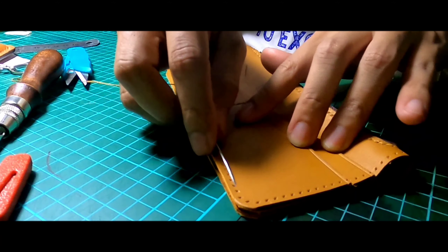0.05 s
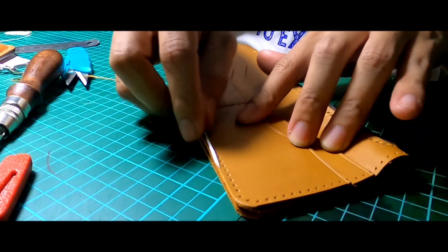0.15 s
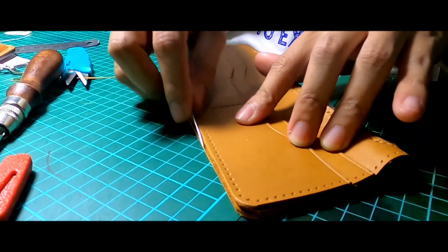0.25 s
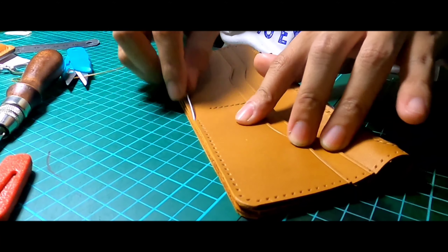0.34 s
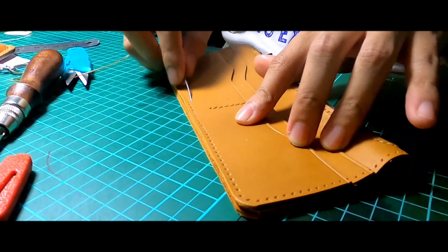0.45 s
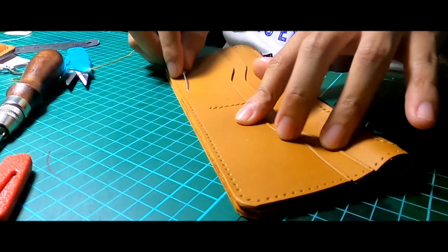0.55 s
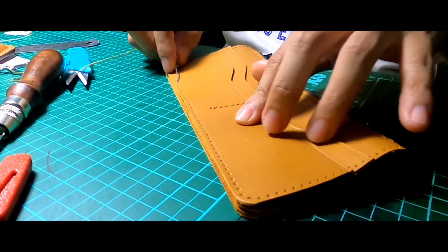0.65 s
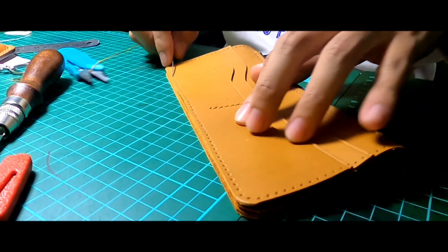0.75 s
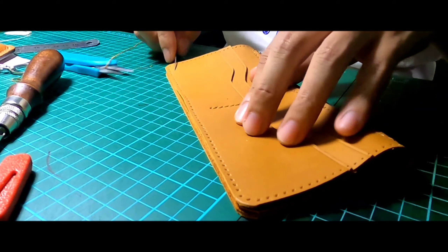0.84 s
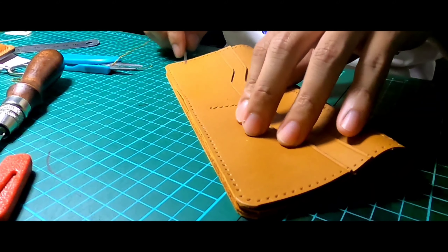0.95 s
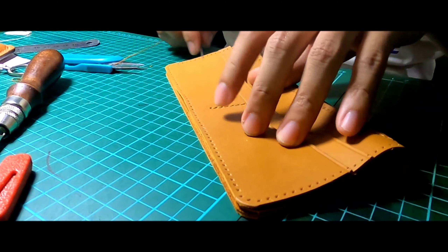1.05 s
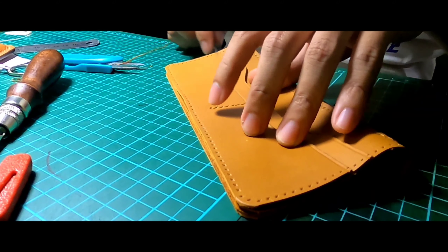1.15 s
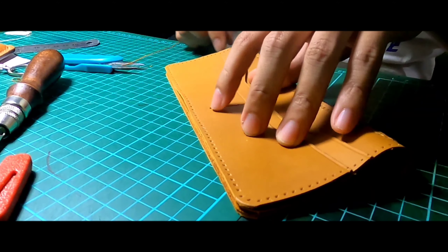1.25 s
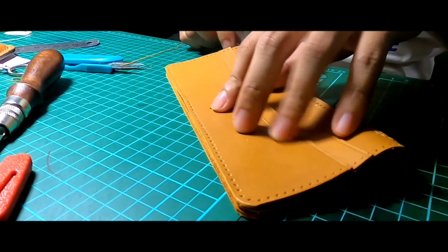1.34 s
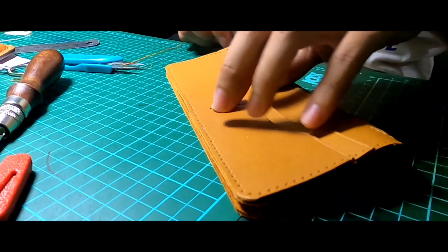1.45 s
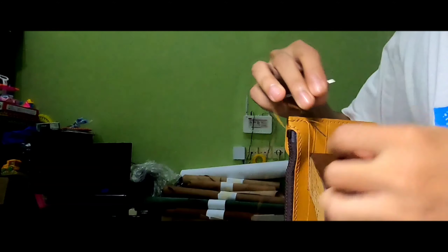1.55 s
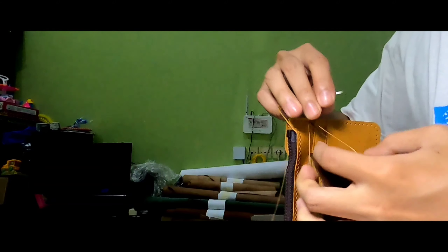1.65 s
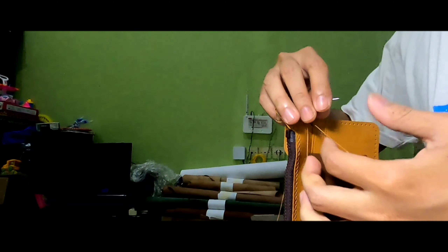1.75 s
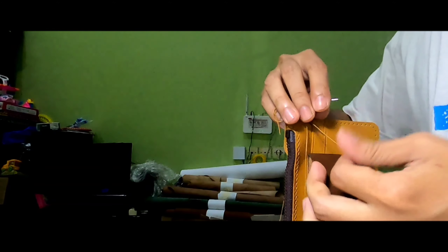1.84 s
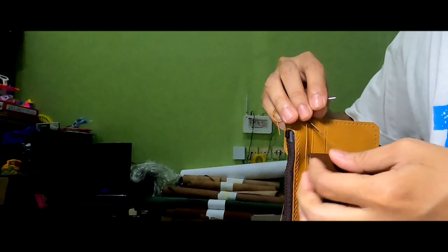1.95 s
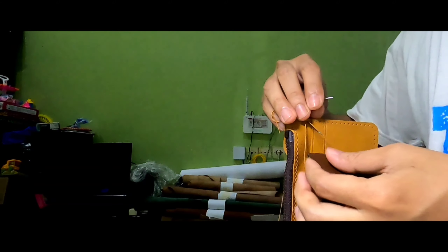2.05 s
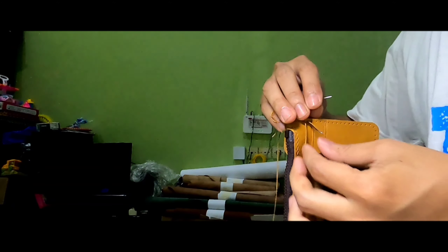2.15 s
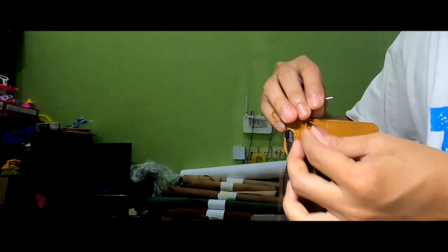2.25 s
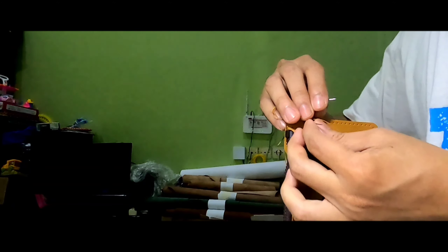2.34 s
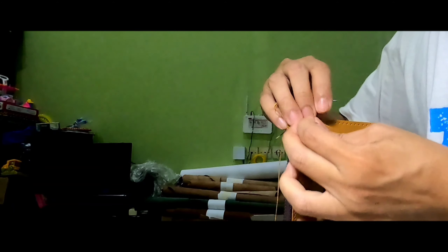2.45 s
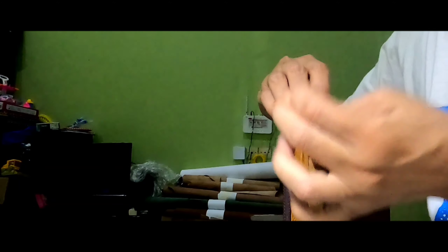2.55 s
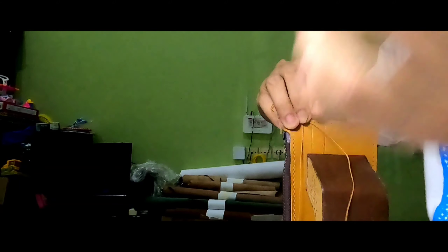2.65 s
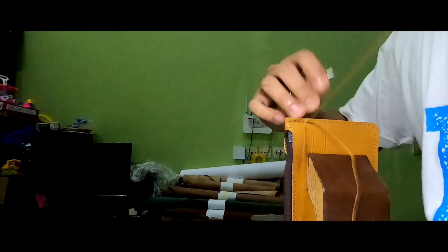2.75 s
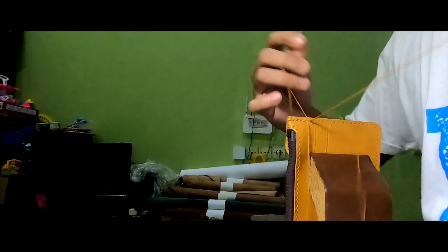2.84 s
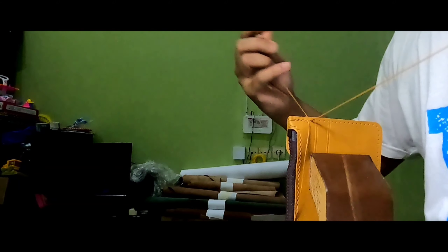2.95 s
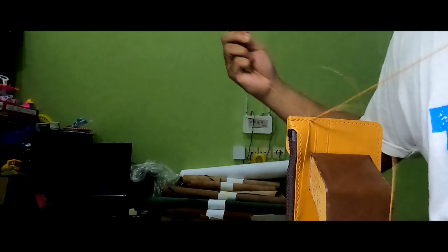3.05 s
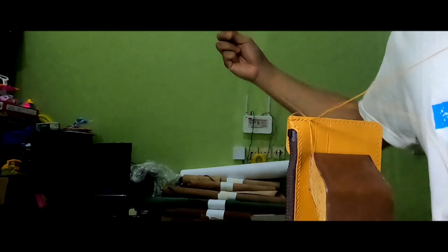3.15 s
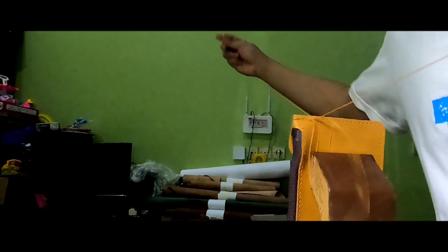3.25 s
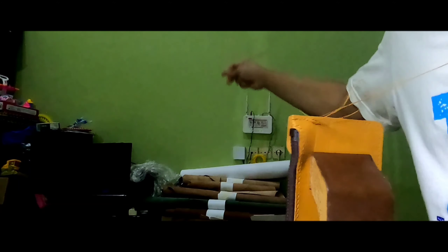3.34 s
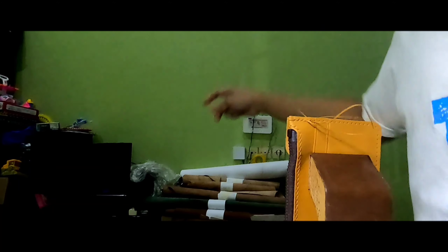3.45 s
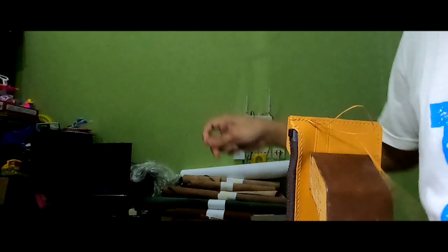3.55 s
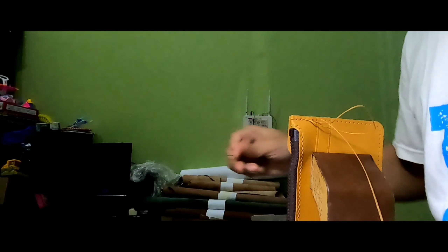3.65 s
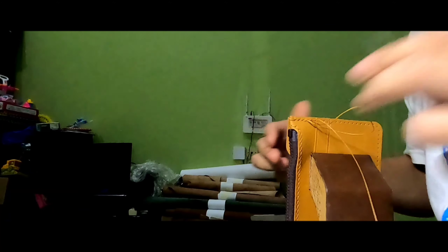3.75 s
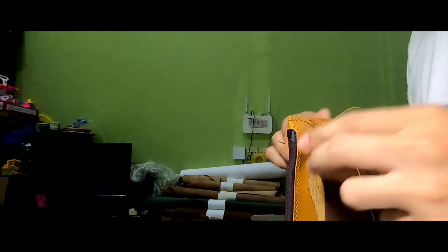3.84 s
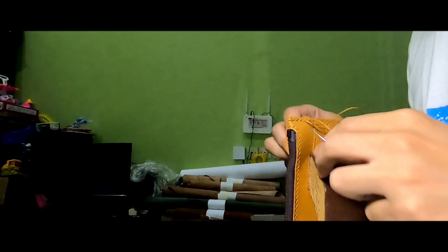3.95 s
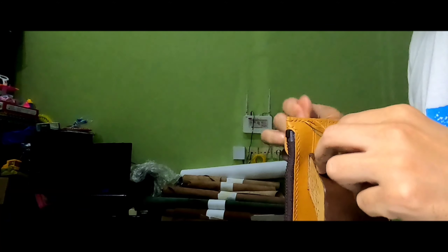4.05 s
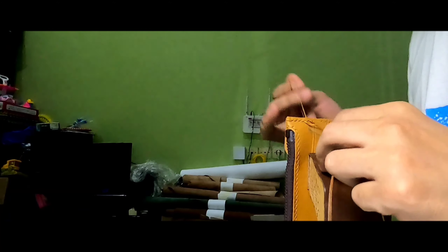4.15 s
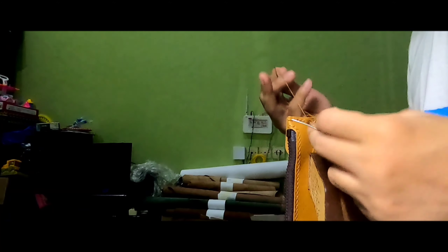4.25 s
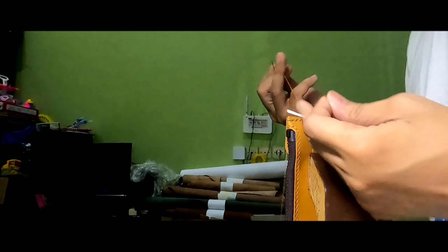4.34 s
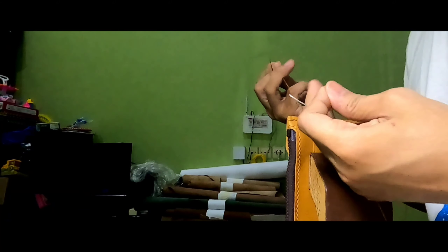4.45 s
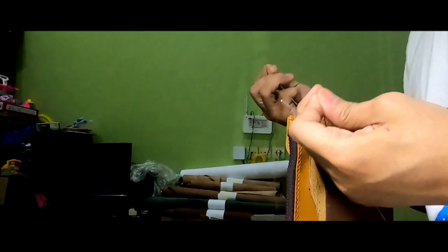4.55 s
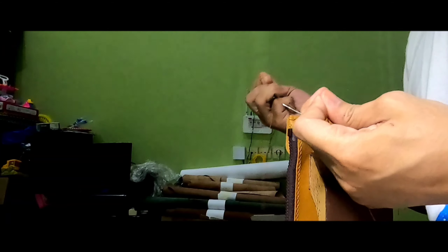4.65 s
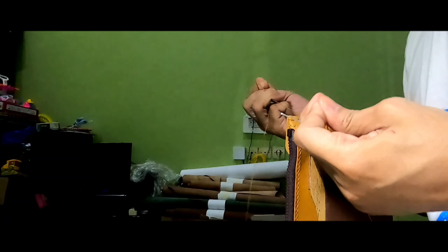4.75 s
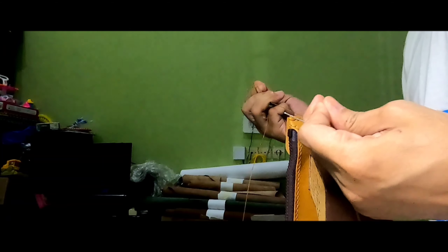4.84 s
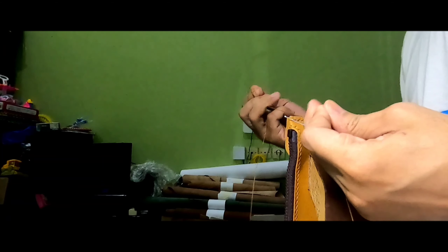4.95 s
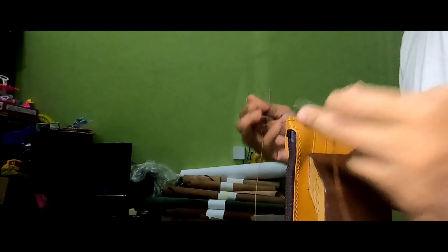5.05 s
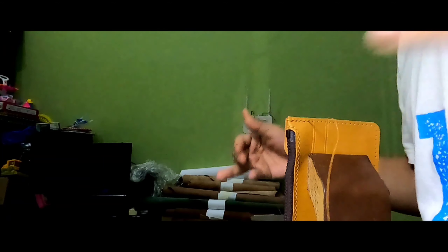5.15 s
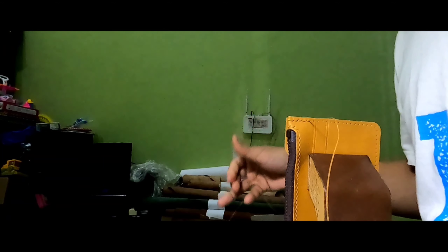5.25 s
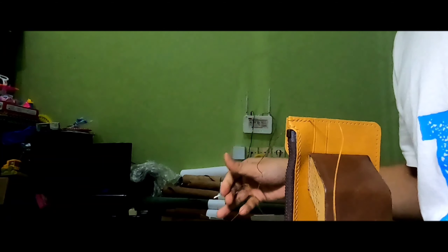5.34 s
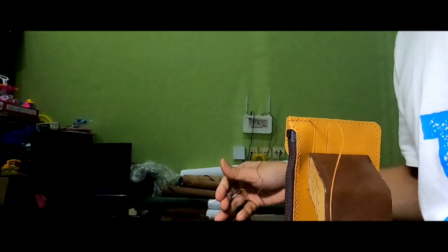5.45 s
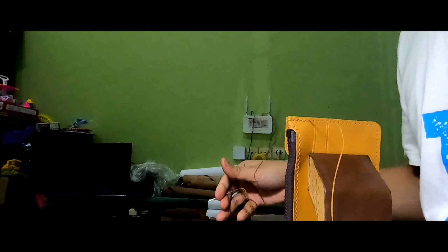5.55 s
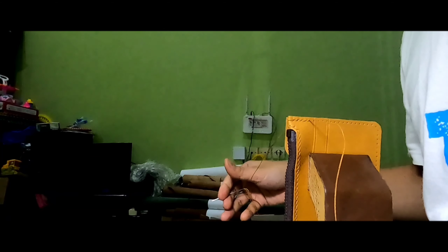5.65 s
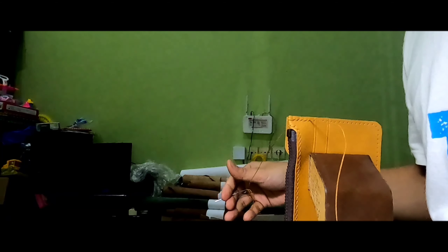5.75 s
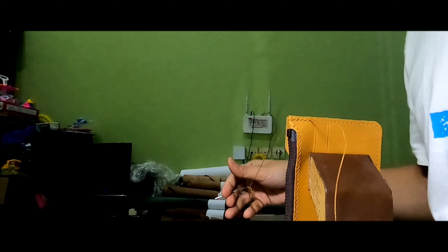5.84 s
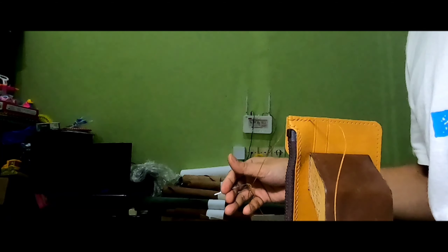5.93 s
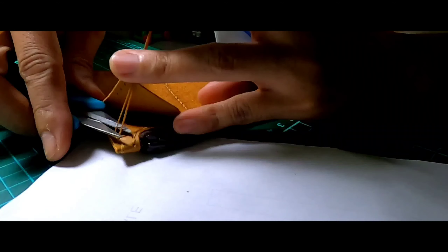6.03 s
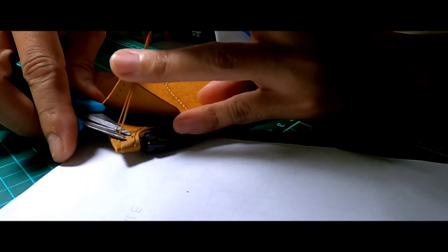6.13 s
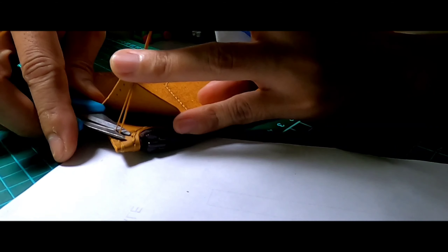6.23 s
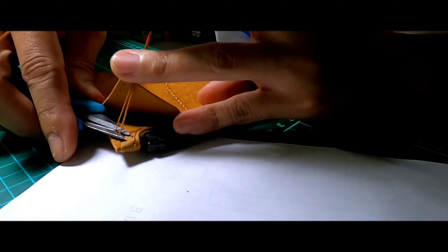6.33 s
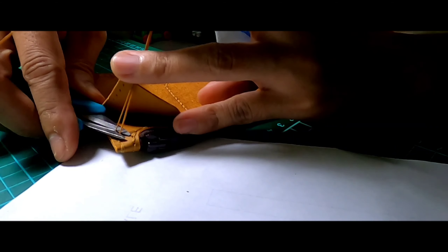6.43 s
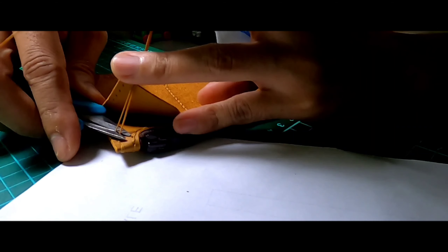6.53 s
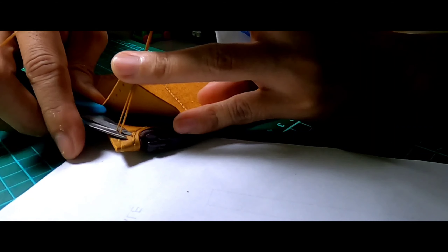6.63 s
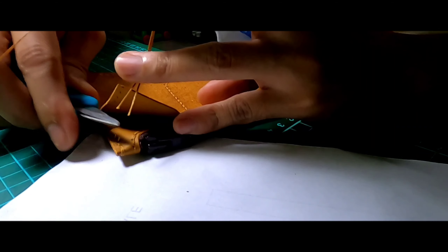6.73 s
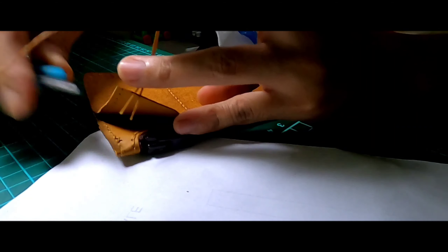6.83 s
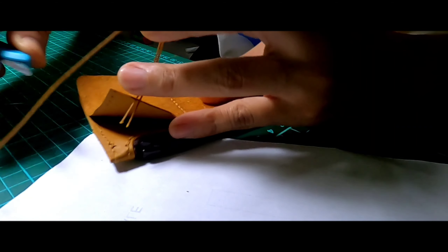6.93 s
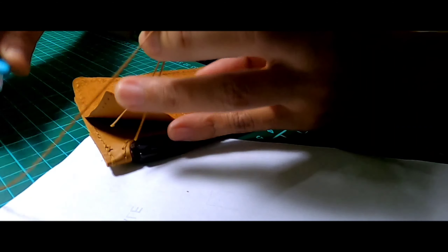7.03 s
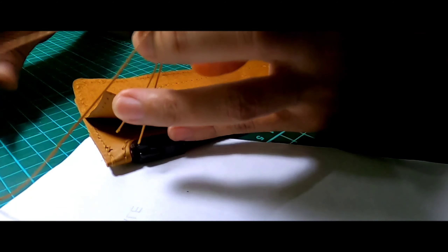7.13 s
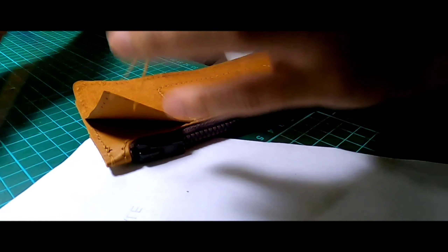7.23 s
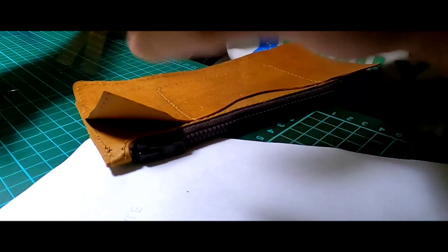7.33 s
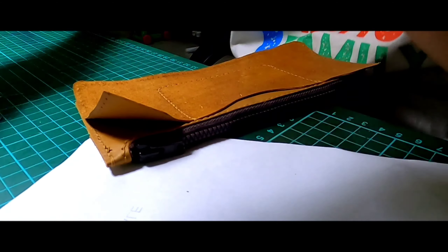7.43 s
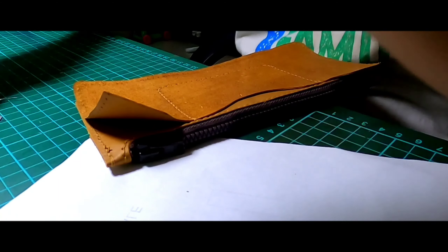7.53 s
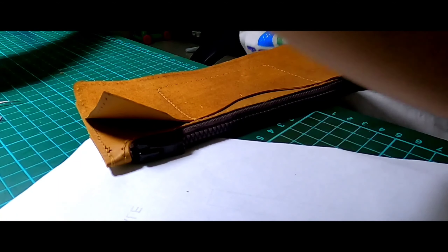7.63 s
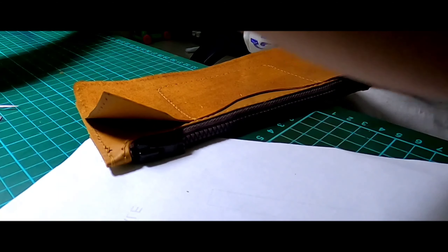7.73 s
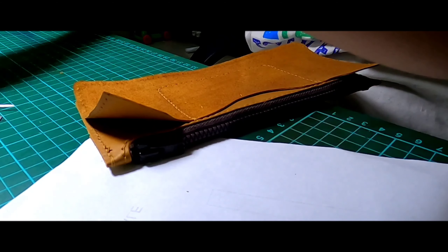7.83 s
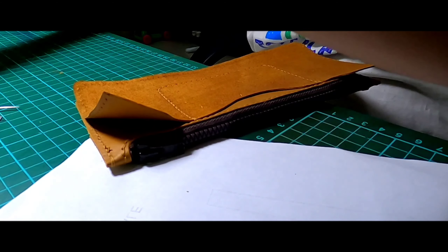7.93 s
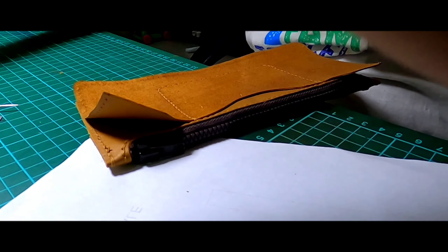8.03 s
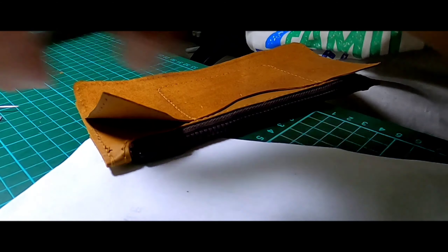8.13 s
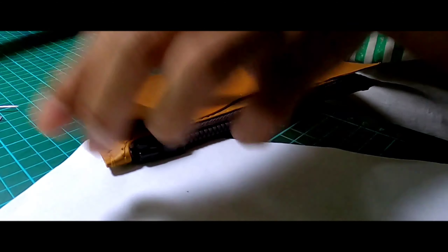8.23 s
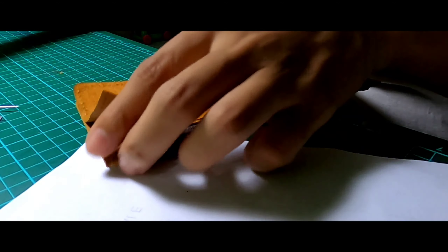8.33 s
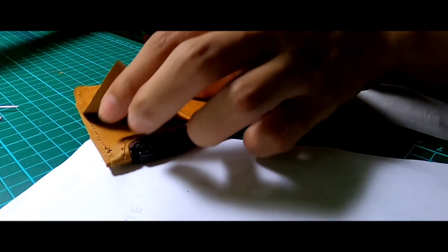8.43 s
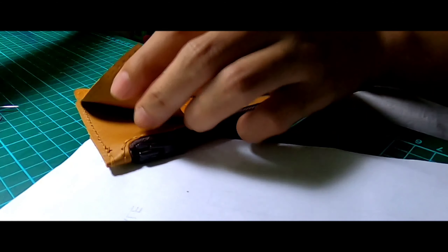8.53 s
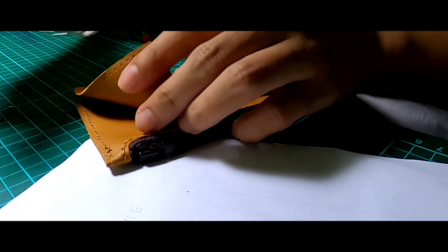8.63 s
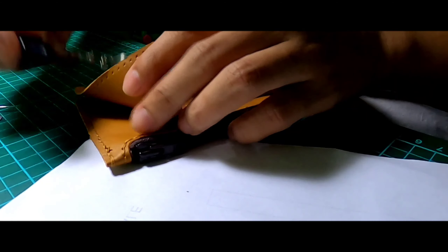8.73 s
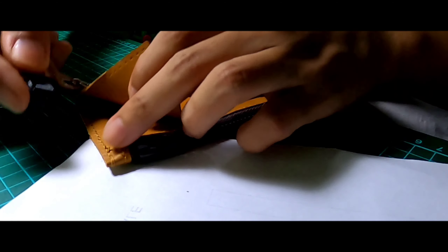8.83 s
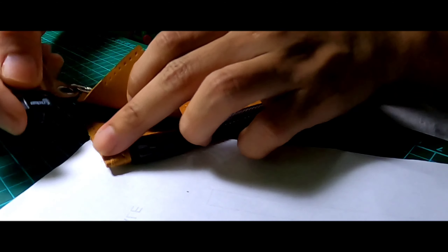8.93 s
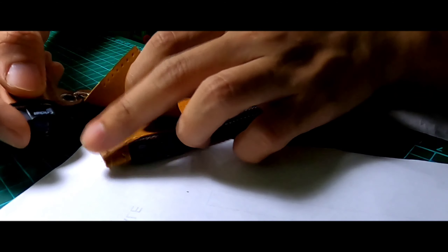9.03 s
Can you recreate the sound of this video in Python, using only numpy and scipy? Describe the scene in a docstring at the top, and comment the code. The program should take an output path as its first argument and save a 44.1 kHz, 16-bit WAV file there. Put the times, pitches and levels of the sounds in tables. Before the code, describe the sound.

The microphone sits close to a leatherworker's bench, with a faint low rumble, a wavering hum and a thin hiss behind the work. For the first 2.7 seconds, fingers slide softly over leather with scattered light ticks and a small metallic clink at about 1.1 seconds. From 2.8 to 3.6 seconds, waxed thread is dragged through a stitch hole in a rasp that rises slightly and ends in a click. Shorter, softer pulls, rustles and ticks continue until about 5.9 seconds, followed by a lull. At 6.9 seconds steel snips cut with a loud, briefly ringing snap, followed by a short bright scrape. Just after 8 seconds comes the loudest moment, a metallic clatter of tools with a thump and low ring from the bench. Lighter knocks and rubbing follow until 8.6 seconds, and a last sharp click lands at 9 seconds.

```python
"""At a leatherworker's bench, a small microphone close to the work, for three successive sittings.
Fingers slide on the hide and waxed thread is dragged through stitch holes, fibres catching and slipping.
Steel snips ring as they cut, and tools knock on the bench and set it thumping.
Behind the work, a low rumble, a wavering hum and a thin hiss fill the room."""
import sys
import numpy as np
from scipy import signal
from scipy.fft import rfft, irfft
from scipy.io import wavfile

SR = 44100
rng = np.random.default_rng(int(sys.argv[2]) if len(sys.argv) > 2 else 0)


def put_to_file(sound):
    """Save the sound as 16-bit audio at rate SR, in the file named by the first command-line argument."""
    columns = np.atleast_2d(sound).T  # one column per channel
    safe = np.clip(columns, -1, 1)
    whole_steps = np.round(safe * 32767)
    wavfile.write(sys.argv[1], SR, whole_steps.astype(np.int16))


N = 400428
GAIN_STEP = 64   # samples between points of a gain curve


# Friction heard close up, one table a sitting. Each row: frequency in Hz, relative level in dB.
FINGERS = [(120, -26), (200, 0.5), (327, -11), (371, -8.5), (630, -15.5), (957, -21.5), (1380, -3.5),
           (3550, -25.5), (4100, -27.5), (5800, -23), (7760, -43), (9660, -44.5), (15500, -45)]
THREAD = [(120, -16.5), (200, -16.5), (350, -10), (550, -15.5), (900, -19), (1080, -8.5), (1220, -11),
          (1550, -9), (2050, -11.5), (2400, -15.5), (3000, -15.5), (3700, -22), (4600, -19), (6000, -24),
          (6900, -31), (7800, -30), (8700, -37), (9500, -32.5), (11000, -41.5), (15500, -45)]
HIDE_ON_PAPER = [(120, -39.5), (200, -9), (358, -6), (525, -12.5), (1130, -21), (1560, -18.5), (2850, -23),
                 (3700, -28), (5200, -25), (5800, -22.5), (6600, -27.5), (8800, -36.5), (9800, -29),
                 (10800, -42), (15500, -47)]

def rubbing(sitting, friction, body_flicker):
    """Hide, bench body and surface hiss each carry their own band of the friction."""
    hide_gain, body_gain, hiss_gain = pressure(sitting)
    rub = colour(friction, (FINGERS, THREAD, HIDE_ON_PAPER)[sitting])
    # each patch of hide takes up the grip at moments of its own
    patches = [amp(1.5 * drift(14)) * band(rub, *edges) for edges in ((850, 1900), (1900, 4100))]
    hide = hide_gain * rms_one(patches[0] - patches[1])
    body = body_gain * body_flicker * rms_one(band(rub, 180, 890))
    hiss = hiss_gain * amp(2.3 * drift(13)) * rms_one(band(rub, 4100, 15800))
    return hide + body + hiss


# Slides and thread pulls by the microphone. Each row: start, firmest moment and end in seconds,
# then hide, bench body and surface hiss levels in dB.
RUBS = [(0.0, -0.007, 0.094, -56.5, -74, -67.5), (0.2, 0.874, 1.07, -61.5, -63, -65.5),
        (0.939, 1.12, 1.22, -54, -50.5, -69), (1.558, 1.705, 1.94, -65, -72, -68.5),
        (1.777, 1.887, 1.98, -64.5, -68, -67.5), (2.057, 2.253, 2.45, -62, -63.5, -72),
        (2.771, 2.837, 2.9, -39.5, -44, -52.5), (2.878, 3.073, 3.48, -42, -46.5, -53.5),
        (3.194, 3.54, 3.627, -37, -42.5, -48.5), (3.653, 3.686, 3.76, -57, -61, -77),
        (3.813, 3.844, 4.09, -57.5, -72, -52.5), (4.015, 4.13, 4.25, -53.5, -61.5, -51),
        (4.304, 4.454, 4.65, -49, -50.5, -55), (4.492, 4.63, 4.74, -52, -82, -50.5),
        (4.76, 4.802, 4.84, -62, -70, -66), (2.46, 2.534, 6.3, -65, -72, -71.5),
        (5.304, 5.445, 5.66, -47.5, -57.5, -52), (5.628, 5.67, 5.9, -63, -72, -71),
        (5.993, 6.08, 6.09, -72.5, -69, -77), (6.917, 6.961, 7.05, -39.5, -35, -44),
        (7.05, 7.104, 7.33, -52, -54.5, -49.5), (7.352, 7.42, 8.2, -70, -74, -71.5),
        (7.85, 7.95, 9.1, -65.5, -72, -64), (8.08, 8.101, 8.204, -32, -20.5, -33),
        (8.213, 8.231, 8.63, -47.5, -46.5, -58), (8.498, 8.603, 8.62, -45.5, -48, -55.5),
        (8.69, 8.784, 8.7, -60, -70, -67.5), (8.999, 9.07, 9.08, -48, -62.5, -55)]
# Hands resting on the work. Each row, one a sitting: hide, bench body and surface hiss levels in dB.
RESTING_HANDS = [(-70.5, -61.5, -79), (-74.5, -72, -82.5), (-84, -71.5, -87.5)]

def pressure(sitting):
    """Gains of hide, bench body and hiss: every rub grips, swells, eases and lets go."""
    swell_db, ease_db = 8.5, 10.5
    grip_db_per_s, release_db_per_s = 598, 158
    t = np.arange(0, N, GAIN_STEP) / SR
    contour_db = [-swell_db - grip_db_per_s, -swell_db, 0, -ease_db, -ease_db - release_db_per_s]
    shapes_db = [np.interp(t, [start - 1, start, firmest, end, end + 1], contour_db)
                 for start, firmest, end, *_ in RUBS]
    return add_in_power(shapes_db, [row[3:] for row in RUBS], RESTING_HANDS[sitting])


def catching_fibres(slips_per_s, spread_db, flicker_db):
    """Fibres catch and slip at random over a smooth hiss."""
    sizes = amp(spread_db * np.minimum(rng.exponential(1, N), 4)) * rng.choice([-1, 1], N)
    slips = rms_one(sizes * (rng.random(N) < slips_per_s / SR))
    return (slips + rng.standard_normal(N)) * amp(flicker_db * drift(12))


# Rubbing strokes, a bright clink and a low bench ring, close by. Each row: start and end in seconds,
# first pitch, last pitch and bandwidth in Hz, level at the middle in dB.
GLIDING_BANDS = [(0.199, 0.271, 2300, 1800, 1900, -58.5), (.64, 0.918, 2093, 2325, 800, -58.5),
                 (0.983, 1.195, 620, 712, 190, -52.5), (1.135, 1.339, 5570, 5220, 2400, -62.5),
                 (1.503, 1.534, 2630, 3070, 980, -62.5), (1.579, 1.637, 2200, 2190, 3000, -56),
                 (1.73, 1.783, 5140, 5500, 2700, -59), (2.105, 2.354, 2400, 2485, 430, -59.5),
                 (2.843, 3.591, 2937, 3120, 230, -52.5), (2.95, 3.594, 260.2, 499.6, 84, -45),
                 (3.05, 3.612, 1487, 1549, 130, -48), (3.471, 3.578, 1948, 2048, 410, -46),
                 (3.83, 3.965, 8500, 8020, 4400, -56), (3.996, 4.1, 4070, 4140, 368, -57),
                 (4.323, 4.578, 280.8, 342, 61, -51), (4.488, 4.704, 8250, 9170, 4100, -57.5),
                 (4.568, 4.732, 2300, 2670, 1230, -47.5), (4.79, 4.84, 2505, 2510, 3200, -64),
                 (4.9, 4.973, 2200, 2210, 3280, -62.5), (5.119, 5.198, 2195, 2320, 1500, -66),
                 (5.25, 5.291, 2489, 2491, 1600, -53.5), (5.481, 5.647, 679, 822, 180, -56.5),
                 (5.745, 5.882, 1355, 1364, 360, -60), (5.762, 5.87, 8070, 7800, 5300, -65),
                 (6.289, 6.322, 5500, 5540, 1100, -60), (6.328, 6.39, 5525, 5400, 1300, -59.5),
                 (6.332, 6.382, 2200, 2160, 730, -57), (7.09, 7.125, 6290, 5040, 730, -28),
                 (7.092, 7.117, 10120, 9900, 7900, -36.5), (7.6, 7.862, 9900, 9500, 3000, -75.5),
                 (7.865, 8.028, 341, 327.5, 68, -44.5), (8.091, 8.602, 124.4, 120.6, 6.7, -38),
                 (8.53, 8.664, 1895, 2000, 800, -58)]

def gliding_bands(noise):
    """Slow noise rides a gliding carrier: one band that swells and fades."""
    out = np.zeros(N)
    for start, end, first_hz, last_hz, width_hz, db in GLIDING_BANDS:
        a, b = round(start * SR), round(end * SR)
        lowpass = signal.butter(2, width_hz / 2, fs=SR, output="sos")
        slow = signal.sosfilt(lowpass, [noise[a:b], noise[:b - a]])
        phase = 2 * np.pi * np.cumsum(np.geomspace(first_hz, last_hz, b - a)) / SR
        glide = slow[0] * np.cos(phase) + slow[1] * np.sin(phase)
        swell = np.abs(np.sin(np.linspace(0, np.pi, b - a))) ** 0.61
        out[a:b] += amp(db) * rms_one(glide) * swell
    return out


# Ticks, snips and knocks near the microphone. Each row: start in seconds, peak in dB, ring in Hz,
# then bench thump, treble and ring levels in relative dB.
CONTACTS = [(0.1998, -41.5, 2510, -5.5, -31, -8), (0.4955, -44.5, 1170, -12, -21, 2),
            (0.9983, -41, 1440, -3, -34, 8), (1.134, -29.5, 6200, -17, -46, -3.5),
            (1.1604, -35.5, 1330, -11, -34, -12), (1.5853, -45, 2340, -7, -22, -13),
            (1.848, -41.5, 1500, -10, -14, -13), (2.0057, -47.5, 1500, -22, -26, -4),
            (2.0506, -50.5, 1820, -12, -33, 0), (2.3445, -49, 2460, -9, -27, -4),
            (2.5155, -40, 1650, -33, -42, -14), (2.5528, -43, 1630, -24, -40, 0),
            (2.783, -33.5, 1470, 5.5, -31, 4), (2.7942, -30, 2060, -7, -21, 1.5),
            (3.044, -39, 3000, -20, -13, 1), (3.134, -37, 3600, -20, -9, 3),
            (3.5447, -21, 1820, -5, -45, 3), (3.6726, -42.5, 1890, -21, -30, -3),
            (3.7204, -41, 1860, -10, -32, 0), (3.7754, -44.5, 1760, -9, -27, -3),
            (3.825, -27, 4500, -40, -40, 0), (4.0328, -44, 4120, -16, -10, -3),
            (4.0886, -29, 2600, -7.5, -35, -5), (4.134, -36, 3780, -27, -4.5, -31),
            (4.2325, -35.5, 1830, -9, -31, -1), (4.4187, -42, 2880, 3, -3, 10),
            (5.26, -48, 2690, -8, -37, 5), (5.3354, -38, 1530, -5.5, -24, -16),
            (5.4069, -36, 1730, -23, -23, -9), (5.6045, -30, 1720, -26, -12.5, -0.5),
            (6.3024, -44, 1960, -17, -36, 1), (6.338, -56, 2100, -10, -34, -2),
            (6.379, -53, 2240, -34, -27, -4), (6.9141, -16.5, 2400, -7.5, -26, 3),
            (6.9198, -5.5, 4660, -8.5, -40, 2), (7.3726, -43, 2830, -15, -2, 0),
            (7.3978, -40, 1400, -6, -10, -15), (7.7744, -50.5, 2200, -10.5, -29, 8),
            (7.878, -44, 1970, 2.5, -9, -9), (7.9334, -44.5, 3490, -12.5, -3.5, 18),
            (8.0486, -22.5, 1900, 1, -10, -4), (8.0729, -4.5, 5450, -6.5, -14, 0.5),
            (8.0786, -11, 2200, -4, -6, -11), (8.0929, -15, 5900, 12, -9, 10),
            (8.0998, -9, 1170, -4, -7, 6), (8.3435, -25, 1900, -1.5, -16, 4),
            (8.3486, -25, 3120, -3, -39, 6), (8.3758, -20, 1450, -7.5, -18, -5),
            (8.392, -36.5, 1550, -16, -8, -6), (8.533, -31.5, 1400, -1, -22, 0),
            (8.5614, -30.5, 1890, -5, -22, 0), (8.8293, -46, 2741, -16, -11.5, -1),
            (9.006, -25.5, 1380, -21, -41.5, 0), (9.023, -8.5, 2620, -7.5, -48, -25),
            (9.045, -39, 1430, -27, -22, 7)]
# The crack of a contact. Each row: frequency in Hz, relative level in dB.
CRACK = [(300, -42), (700, -9.5), (1340, 2.5), (2700, 1), (3500, -1), (4700, 0), (5700, -2.5), (7500, -17),
         (10000, -37)]
# Modes of the bench under the work. Each row: pitch in Hz, gain in dB, time to fall 60 dB in seconds.
BENCH_MODES = [(84, -9.5, 0.16), (117, -9, 0.23), (190.2, -11.5, 0.26), (251.4, -6.5, 0.082),
               (301, 3.5, 0.042), (361, -3.5, 0.14), (418.4, -4.5, 0.068), (517, -5.5, 0.067),
               (620, -5.5, 0.075), (783, -6, 0.06), (829, -4, 0.058), (1014, -5.5, 0.021)]

def tool_contacts():
    """Each contact clicks, rattles briefly, rings the part that is struck and thumps the bench."""
    size = 4096
    t = np.arange(size) / SR
    out, thumps = np.zeros(N + size), np.zeros((len(BENCH_MODES), N))
    signs = (-1) ** np.arange(len(BENCH_MODES))   # neighbouring modes move in opposite phase
    for start, db, ring_hz, thump_db, treble_db, ring_db in CONTACTS + faint_ticks(count=40):
        rattle_t60 = 0.032 * np.exp(-0.05 * (db + 27.5))   # firmer contacts rattle for less time
        decay = amp(-60 * t / rattle_t60) + amp(-18.5 - 60 * t / 0.17)
        rattle = rng.standard_normal(size) * np.minimum(t / 0.0022, 1) * decay
        rattle[70] += 3.5   # the firmest touch comes just after first contact
        top_hz = np.clip(9000 * amp(0.32 * (db + 25)), 1500, 16000)   # a lighter touch is duller
        crack = peak_one(band(colour(rattle, CRACK), 200, top_hz))
        ring = amp(ring_db) * peak_one(resonate(rattle, ring_hz, ring_hz / 8))
        treble = amp(treble_db) * peak_one(band(rattle, 7000, 12000))
        at = round(start * SR)
        out[at:at + size] += amp(db) * (peak_one(crack + ring) + treble)
        scatter_db = rng.normal(0, 3, len(BENCH_MODES))
        thumps[:, at + 60] += signs * amp(db + thump_db + scatter_db - 8)
    return out[:N] + sum(ring_mode(clicks, *mode) for mode, clicks in zip(BENCH_MODES, thumps))


def faint_ticks(count):
    """Light contacts fall at random inside the rubs, as strong as each rub allows."""
    rows = []
    for k, (when, softness, pitch) in enumerate(rng.random((count, 3))):
        start, _, end, hide_db = RUBS[k % len(RUBS)][:4]
        time = min(start + when * (end - start), 9.0)
        db = min(hide_db + 9.5, -45) - 2.5 * softness
        rows.append((time, db, 1400 * 2.5 ** pitch, -14, -24, 0))
    return rows


# Steel snips at close range. Each row: start in seconds, blade strike and spring strike in dB.
CLINKS = [(1.133, -34, -39.5), (3.825, -55, -42), (6.914, -22, -38), (6.9217, -5, -30), (7.1, -29, -35),
          (7.111, -27.5, -28), (7.373, -45, -50.5), (8.0525, -45.5, -29), (8.0767, -22, -18),
          (8.098, -21, -25), (9.0248, -30, -34)]
# Their modes. Each row: pitch in Hz, gain in dB, time to fall 60 dB in seconds.
BLADE_MODES = [(2740, -4.5, 0.0077), (4780, 1, 0.0099)]
SPRING_MODES = [(5830, -4.5, 0.11), (5900, -9, 0.049), (9500, -13.5, 0.052)]

def snips():
    """Each clink strikes the blades, which die at once, and the spring, which rings on."""
    starts, blade_db, spring_db = np.transpose(CLINKS)
    clicks = np.zeros((2, N))
    clicks[:, (starts * SR).astype(int)] = amp([blade_db, spring_db])
    blades = sum(ring_mode(clicks[0], *mode) for mode in BLADE_MODES)
    spring = sum(ring_mode(clicks[1], *mode) for mode in SPRING_MODES)
    return blades + spring


# Swells of the room's low rumble and hum. Each row: time in seconds, rumble and hum peaks in dB.
LOW_SWELLS = [(0.06, -52, -63), (0.25, -39, -63), (0.48, -38.5, -62), (0.68, -41, -43), (0.86, -35, -44.5),
              (0.97, -42, -45), (1.2, -56, -43), (1.52, -58, -49), (1.69, -46, -53), (2.12, -64, -56),
              (2.65, -57, -52.5), (2.8, -57, -44), (3.13, -59, -50), (3.56, -42.5, -58), (4.17, -66, -60),
              (4.37, -56, -51), (4.55, -57, -56), (5.06, -62, -74), (5.36, -51, -80), (5.69, -59, -73),
              (5.92, -58, -70), (6.04, -52, -63), (6.31, -45, -62.5), (6.57, -50, -62), (6.73, -46, -59),
              (6.98, -31, -44), (7.21, -45, -56), (7.36, -48, -52.5), (7.61, -53, -73), (7.76, -49.5, -53),
              (7.99, -47, -41.5), (8.12, -32, -31.5), (8.23, -34, -32.5), (8.39, -33, -34.5),
              (8.6, -36.5, -43), (8.8, -54, -56), (9.03, -39, -48)]
# The low end between swells. Each row, one a sitting: rumble and hum levels in dB.
STEADY_LOW_END = [(-49.5, -52), (-69, -58), (-54.5, -61)]

def low_swells(sitting, rise_db_per_s=200.5, fall_db_per_s=151.5):
    """Gains of rumble and hum: both swell briefly above their steady level."""
    swells = np.array(LOW_SWELLS)
    since_peak = np.arange(0, N, GAIN_STEP) / SR - swells[:, :1]
    shapes_db = np.minimum(rise_db_per_s * since_peak, -fall_db_per_s * since_peak)
    return add_in_power(shapes_db, swells[:, 1:], STEADY_LOW_END[sitting])


# Room rumble, near and far, and each sitting's hum. Each row: centre and width in Hz, relative dB.
RUMBLE_NEAR = [(45.8, 15.7, 10.5), (76.5, 30, -19.5)]
RUMBLE_FAR = [(46, 6.4, -6.5), (78, 67, -7.5)]
HUM_FIRST = [(168.1, 17, -2), (95, 33, -14.5), (213, 28, -13)]
HUM_SECOND = [(198.3, 20, 0), (155.2, 25, -4), (99, 73, -16.5)]
HUM_THIRD = [(125, 62, 3.5), (193.5, 53, 2.5), (150.8, 26, 1.5)]
# Thin hiss behind each sitting. Each row: centre and width in Hz, level in dB.
HISS_FIRST = [(340.5, 5.2, -64), (6850, 630, -64.5), (9360, 530, -75.5)]
HISS_SECOND = [(363, 166, -70), (7100, 2500, -83.5), (9300, 400, -89.5)]
HISS_THIRD = [(294, 47, -80.5), (5760, 1500, -83), (9380, 600, -89.5)]
# The air around the bench. Each row: frequency in Hz, relative level in dB.
AIR = [(120, -25), (200, -5), (268, -18.5), (298, -22.5), (479, -45.5), (653, -29.5), (702, -46),
       (890, -36), (1010, -22.5), (15500, -60)]

def room_tones():
    """Yields the room for each sitting: rumble, hum and hiss are resonant noise over faint air."""
    air = amp(-66.5) * rms_one(colour(rng.standard_normal(N), AIR))
    near, far = (rms_one(resonant_noise(modes)) for modes in (RUMBLE_NEAR, RUMBLE_FAR))
    waver = amp(2.5 * drift(1.6))
    rooms = (near, HUM_FIRST, HISS_FIRST), (far, HUM_SECOND, HISS_SECOND), (near, HUM_THIRD, HISS_THIRD)
    for sitting, (rumble, hum_modes, hiss_modes) in enumerate(rooms):
        rumble_gain, hum_gain = low_swells(sitting)
        hum = hum_gain * rms_one(resonant_noise(hum_modes))
        yield waver * rumble_gain * rumble + hum + resonant_noise(hiss_modes) + air


def resonant_noise(modes):
    """Steady noise through resonances, each applied again at double width."""
    return sum(amp(db) * rms_one(resonate(resonate(rng.standard_normal(N), hz, width), hz, 2 * width))
               for hz, width, db in modes)


def amp(db):
    """Decibels to gain."""
    return 10 ** (np.asarray(db) / 20)


def rms_one(x):
    """Scales to rms 1."""
    return x / np.sqrt(np.mean(x ** 2) + 1e-20)


def peak_one(x):
    """Scales to peak 1."""
    return x / abs(x).max()


def band(x, low_hz, high_hz):
    """Butterworth band-pass."""
    return signal.sosfilt(signal.butter(3, [low_hz, high_hz], "band", fs=SR, output="sos"), x)


def colour(x, spectrum):
    """Causal filter with the given spectrum: minimum phase by folding the cepstrum."""
    hz, db = np.transpose(spectrum)
    grid_hz = np.arange(1, 2050) * SR / 4096
    cepstrum = irfft(np.interp(np.log(grid_hz), np.log(hz), db) * np.log(10) / 20)
    cepstrum[1:2048] *= 2
    cepstrum[2049:] = 0
    return signal.fftconvolve(x, irfft(np.exp(rfft(cepstrum))))[:len(x)]


def resonate(x, hz, width_hz):
    """Two-pole resonance, gain 1 at its peak."""
    r, w = np.exp(-np.pi * width_hz / SR), 2 * np.pi * hz / SR
    gain = (1 - r * r) / 2
    return signal.lfilter([gain, 0, -gain], [1, -2 * r * np.cos(w), r * r], x)


def ring_mode(clicks, hz, db, t60):
    """Each click sets a dying sine ringing."""
    r, w = amp(-60 / (t60 * SR)), 2 * np.pi * hz / SR
    return amp(db) * signal.lfilter([0, np.sin(w)], [1, -2 * r * np.cos(w), r * r], clicks + 1e-18)


def drift(rate_hz):
    """Smooth random wander of rms 1."""
    r = np.exp(-2 * np.pi * rate_hz / SR)
    return rms_one(signal.lfilter([1], [1, -2 * r, r * r], rng.standard_normal(N + SR))[SR:])


def add_in_power(shapes_db, levels_db, steady_db):
    """Events add their power to a steady level; one gain curve per column of levels."""
    power = amp(np.transpose(levels_db)) ** 2 @ amp(shapes_db) ** 2 + amp(steady_db)[:, None] ** 2
    return [np.interp(np.arange(N), np.arange(0, N, GAIN_STEP), np.sqrt(p)) for p in power]


# The sittings at the bench. Each row: start and end in seconds.
SITTINGS = [(0, 1.76), (1.76, 6.083), (6.09, 9.08)]
# Each entry, one a sitting: fade-in time in seconds.
FADE_IN_S = [0.00052, 0.003, 0.19]

def scene():
    """Three sittings, the handwork in front and the room behind."""
    t = np.arange(N) / SR
    rooms = list(room_tones())
    friction = catching_fibres(slips_per_s=2000, spread_db=3.8, flicker_db=1.2)
    body_flicker = amp(2.2 * drift(5.1))
    mono = gliding_bands(friction) + tool_contacts() + snips()
    for sitting, (start, end) in enumerate(SITTINGS):
        fade_in = np.clip((t - start) / FADE_IN_S[sitting], 0, 1)
        fade_out = np.clip((end - t) / 0.004 + 1, 0, 1)
        mono += fade_in * fade_out * (rubbing(sitting, friction, body_flicker) + rooms[sitting])
    return np.array([mono, mono])


def record(dry):
    """One small capsule feeds both channels; the highest treble leans right and flickers between them."""
    capsule_bass_loss = signal.butter(2, 30, "high", fs=SR, output="sos")
    dry = signal.sosfilt(capsule_bass_loss, dry)
    flicker = drift(300)
    highest = signal.sosfiltfilt(signal.butter(4, 11500, "high", fs=SR, output="sos"), dry[0])
    side = highest * (0.35 + 0.6 * flicker) + amp(-36) * flicker * band(dry[0], 800, 12000)
    top_cut = signal.cheby2(14, 70, 16600, fs=SR, output="sos")
    return signal.sosfilt(top_cut, dry + side * [[-1], [1]])


dry = scene()
out = record(dry)
put_to_file(out)
```